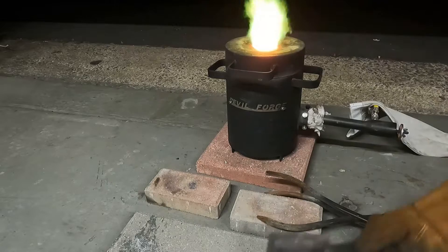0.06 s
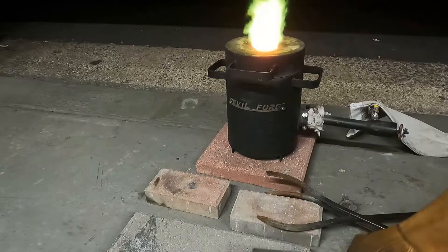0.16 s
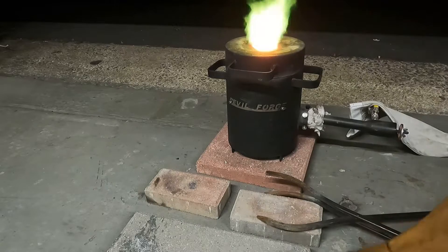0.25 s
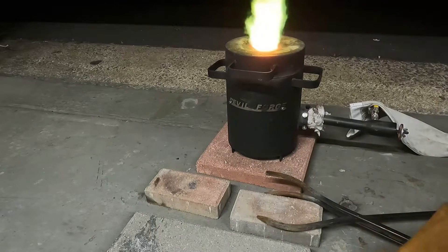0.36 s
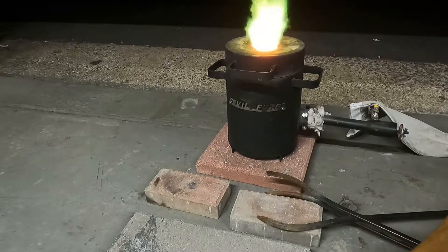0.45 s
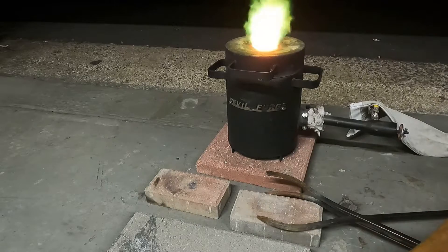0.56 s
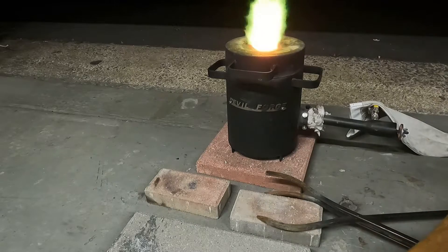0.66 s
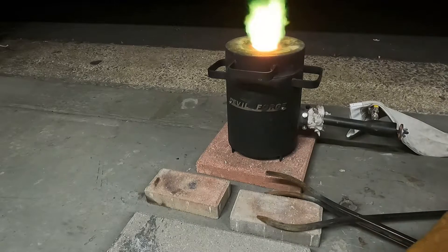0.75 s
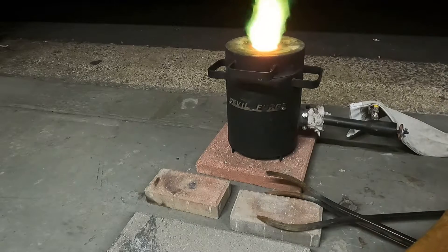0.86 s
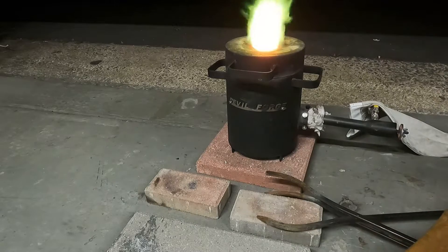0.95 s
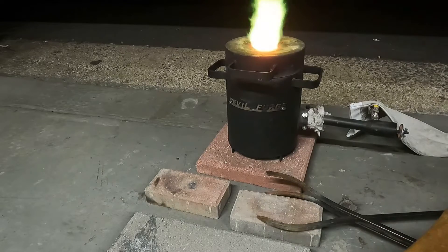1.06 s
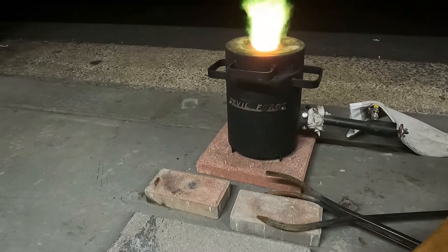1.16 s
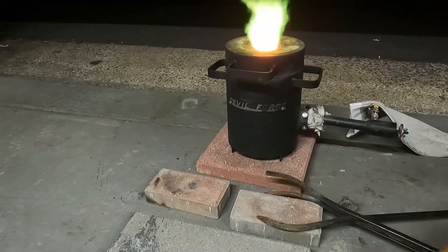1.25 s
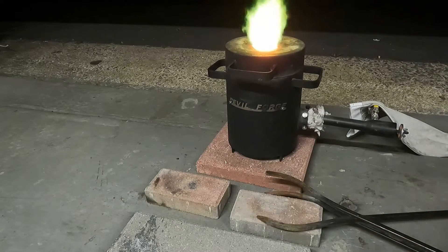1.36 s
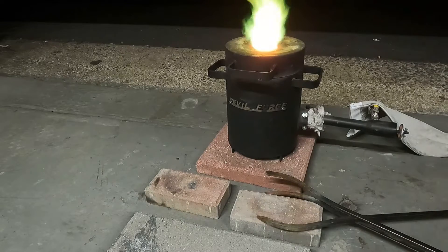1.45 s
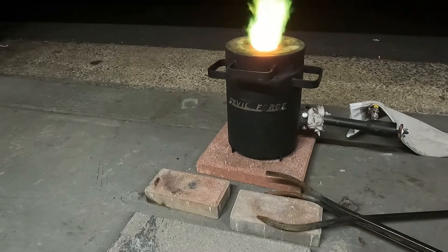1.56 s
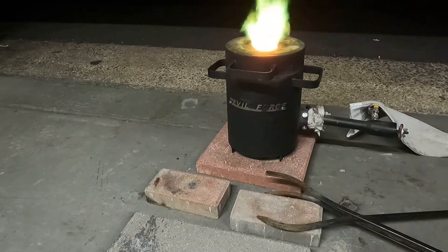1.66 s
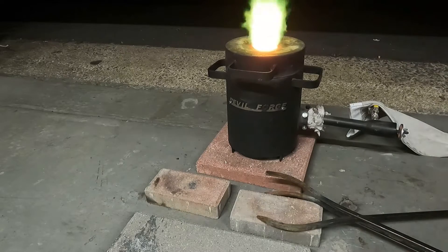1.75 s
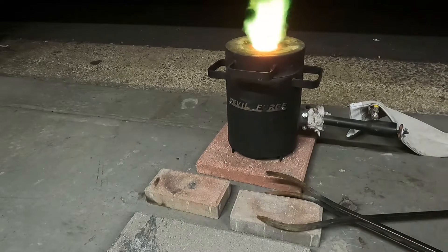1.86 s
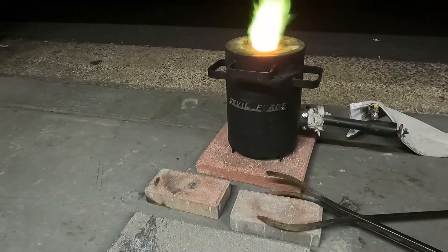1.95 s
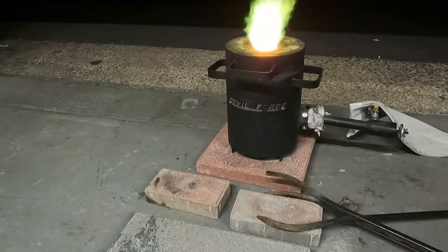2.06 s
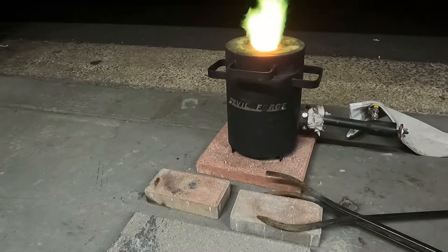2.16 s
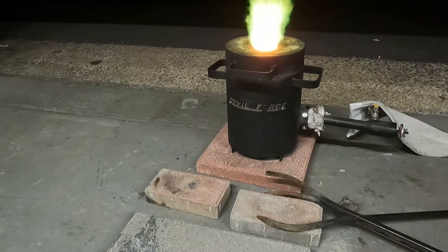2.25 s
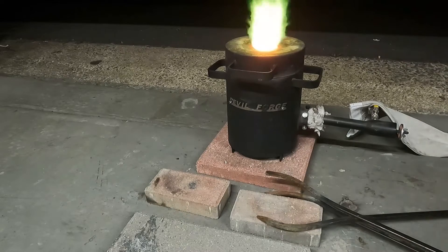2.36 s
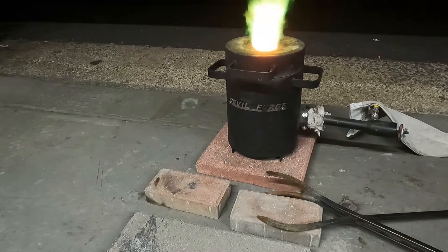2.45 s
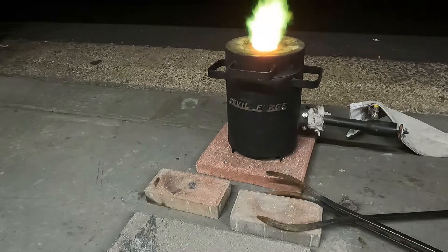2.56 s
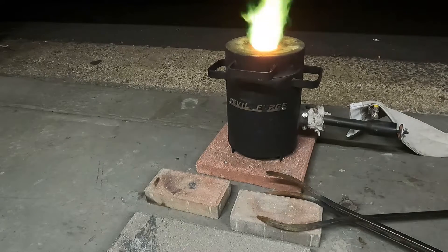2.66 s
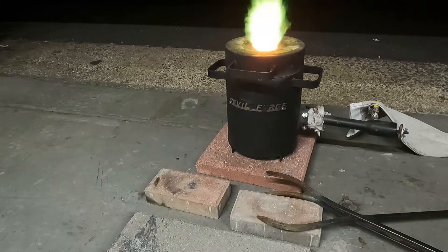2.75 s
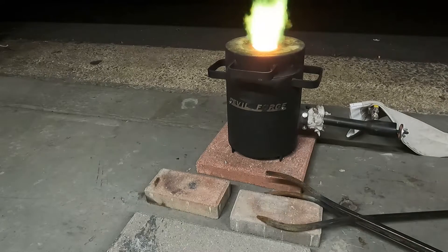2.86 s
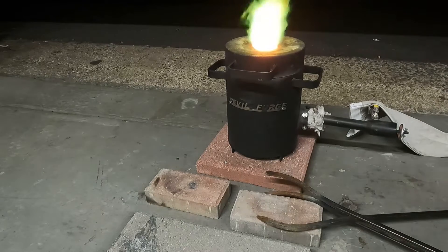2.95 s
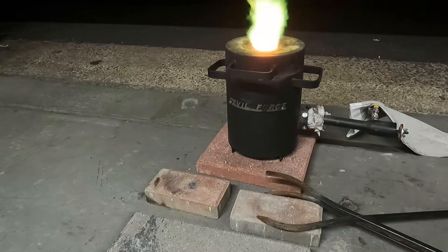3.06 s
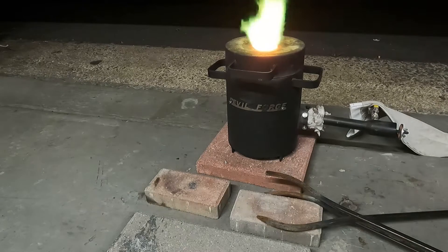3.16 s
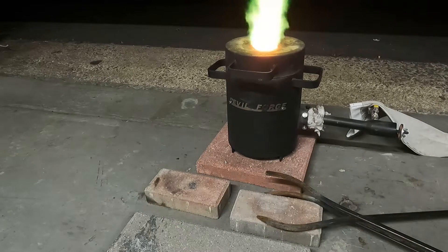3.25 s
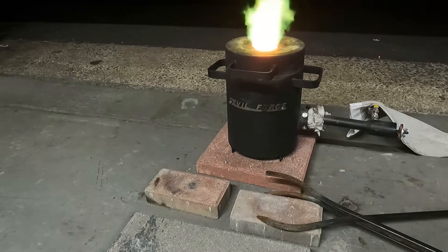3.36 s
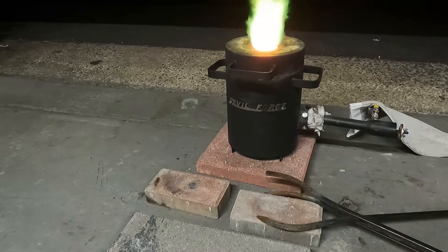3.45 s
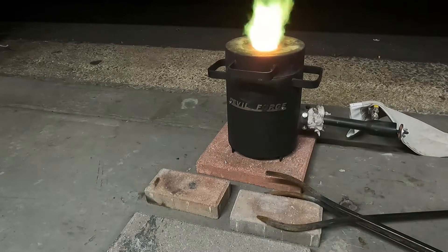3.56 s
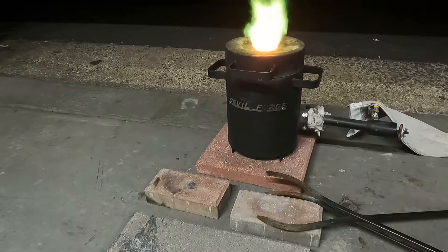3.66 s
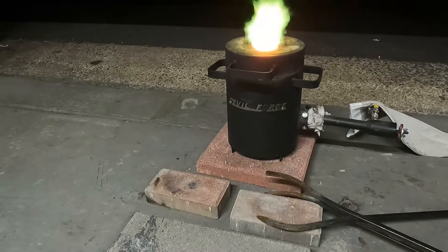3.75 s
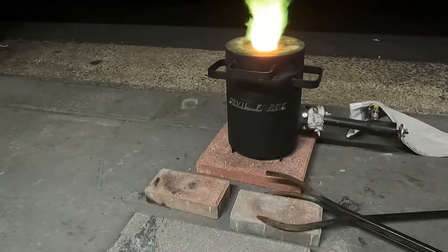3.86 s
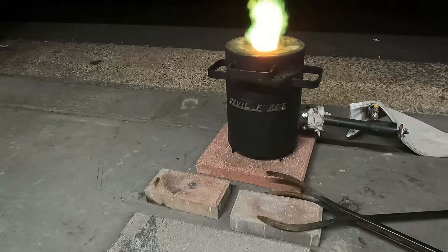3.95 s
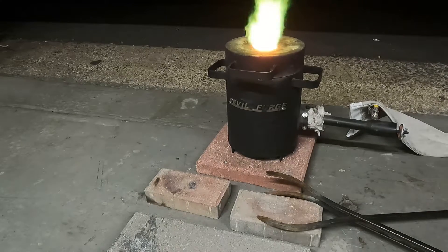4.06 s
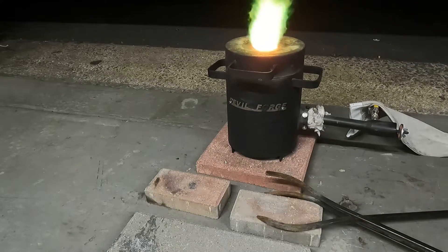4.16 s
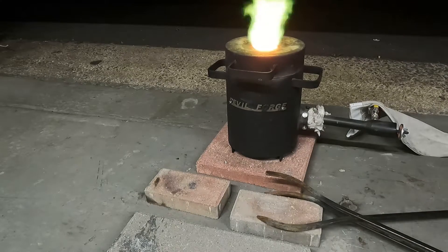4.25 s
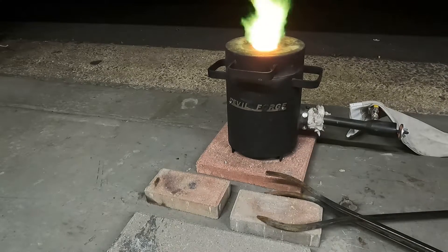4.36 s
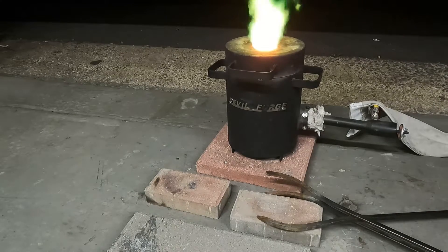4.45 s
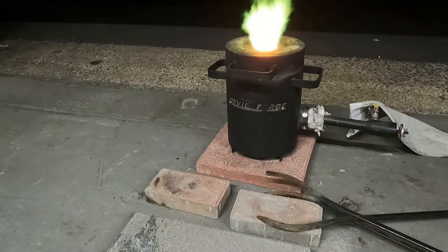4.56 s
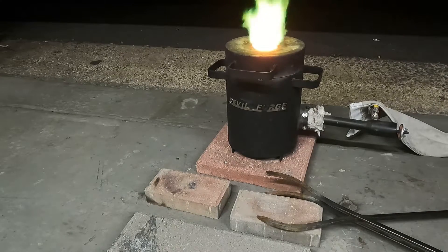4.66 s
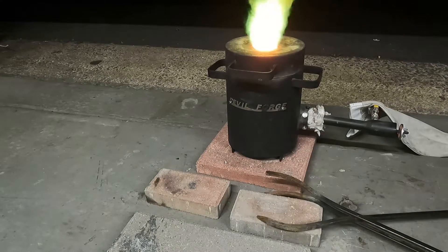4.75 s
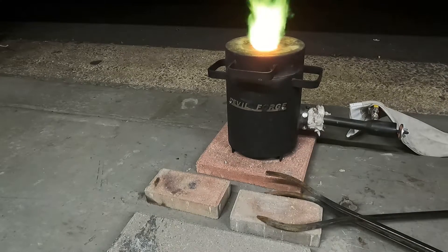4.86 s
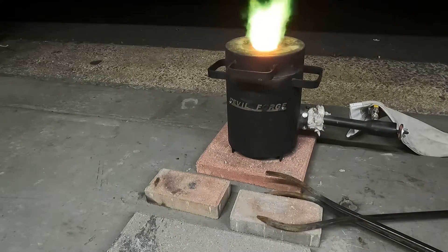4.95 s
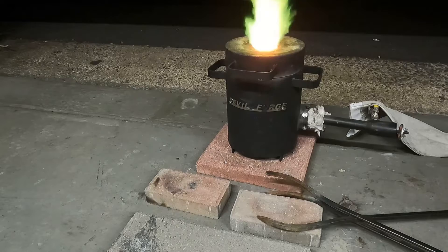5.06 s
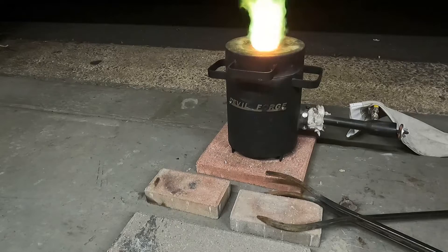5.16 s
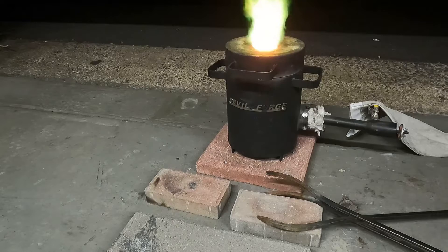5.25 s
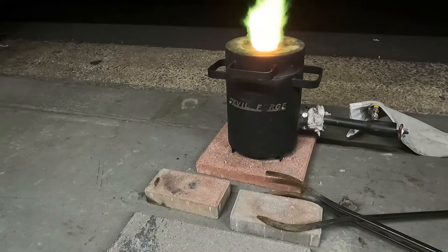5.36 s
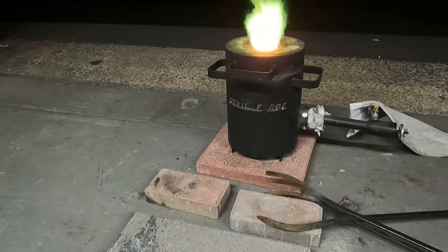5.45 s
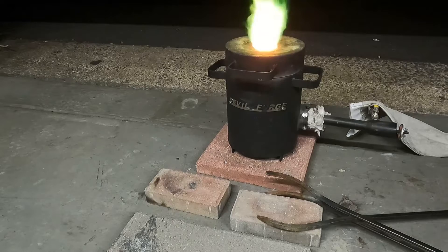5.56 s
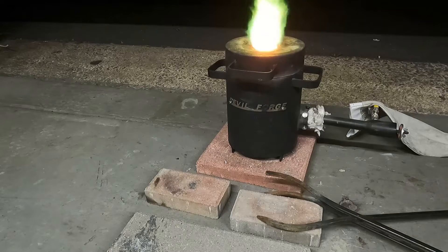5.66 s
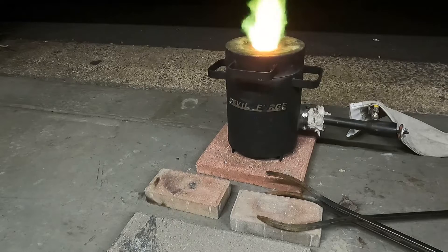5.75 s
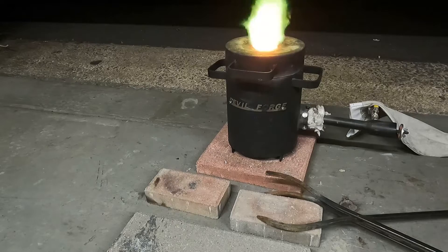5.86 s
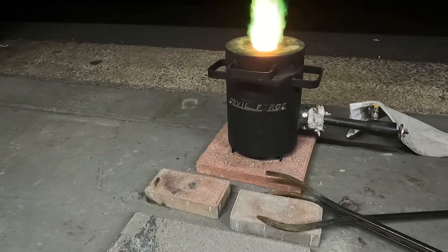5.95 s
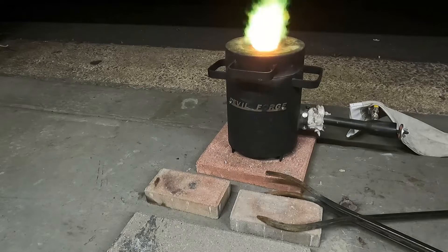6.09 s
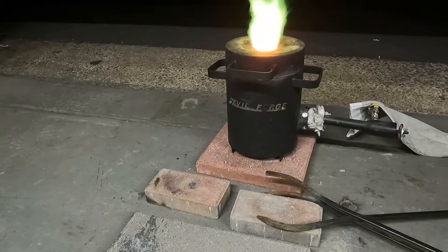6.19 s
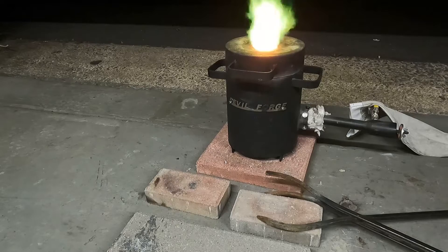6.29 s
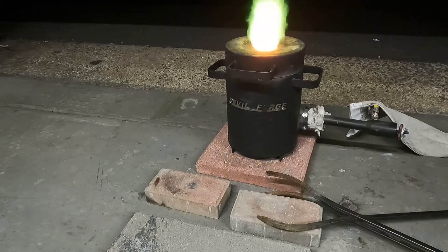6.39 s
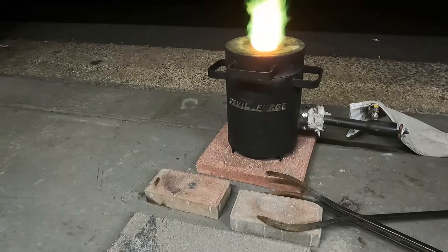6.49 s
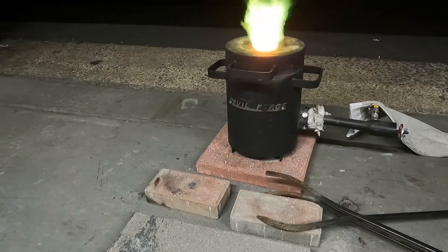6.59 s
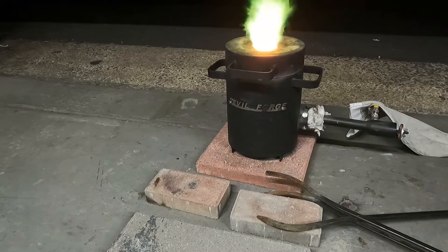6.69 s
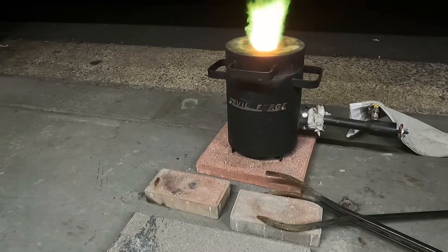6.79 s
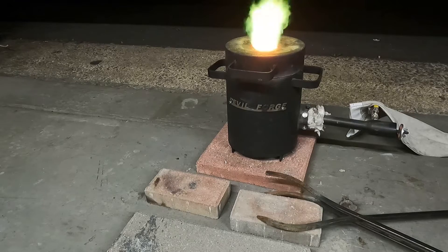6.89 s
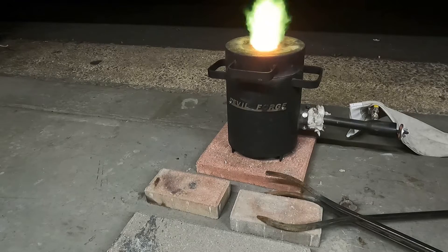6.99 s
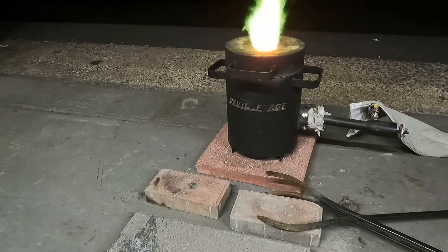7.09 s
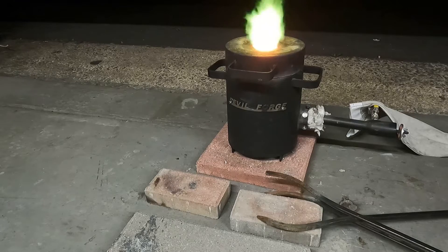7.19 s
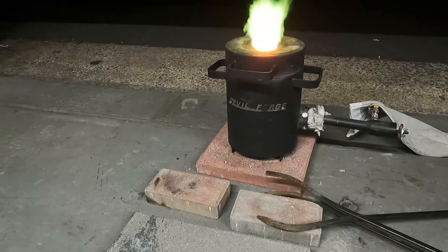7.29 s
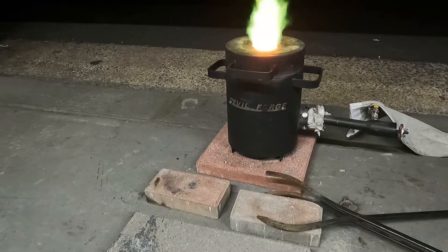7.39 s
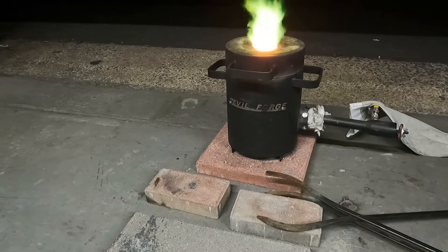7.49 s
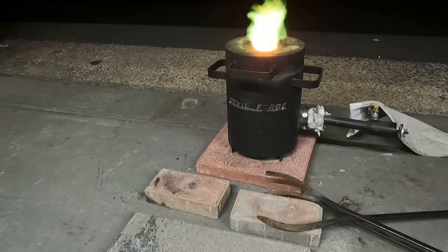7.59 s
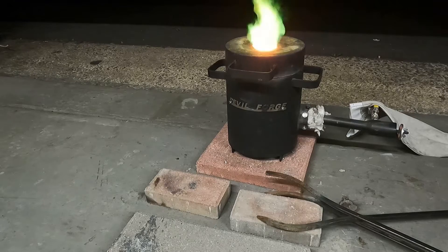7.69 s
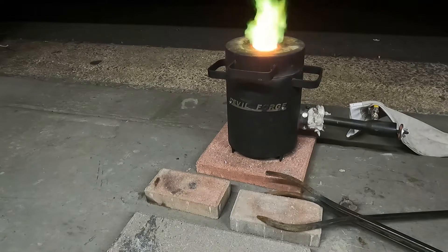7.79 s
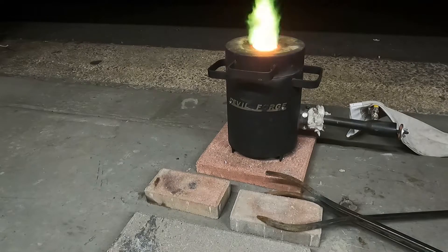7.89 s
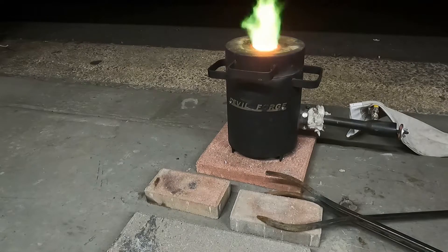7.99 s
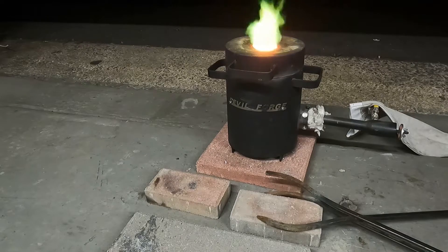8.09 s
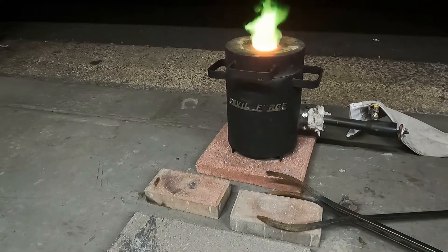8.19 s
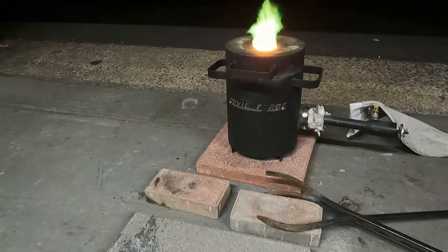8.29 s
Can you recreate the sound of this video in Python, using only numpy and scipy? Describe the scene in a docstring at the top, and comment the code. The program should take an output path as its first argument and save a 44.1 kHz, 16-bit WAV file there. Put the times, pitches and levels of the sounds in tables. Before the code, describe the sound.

A propane burner roars low and steady in a small furnace, one dull steel clack early on, the roar sinking near the end.

```python
"""A propane burner roars into a small melting furnace on a concrete yard, heard by two microphones close by.
From the start the flame drones in the furnace and the gas jet hisses in the burner tube: both are shaped noise.
After half a second a steel tool is laid on the concrete once: a short crack and a few damped tones.
Near the end the valve is turned down and the roar and hiss sink. Nearby walls answer the burner and the tool
throughout, over a faint steady background, and a compressor holds the bass peaks down."""
import sys
import numpy as np
from scipy import signal
from scipy.fft import rfft, irfft, next_fast_len
from scipy.io import wavfile
from scipy.ndimage import uniform_filter1d, minimum_filter1d, map_coordinates

SR = 44100
rng = np.random.default_rng(int(sys.argv[2]) if len(sys.argv) > 2 else 0)


def unload_audio(sound):
    """Save the sound as a 16-bit wav file, at the path given as the first command line argument."""
    columns = np.transpose(np.atleast_2d(sound))
    # keep every value between -1 and 1, then stretch to whole-number steps
    steps = np.round(np.clip(columns, -1, 1) * 32767)
    wavfile.write(sys.argv[1], SR, steps.astype(np.int16))


N = 367353  # length in samples

# Faint steady background. Each row: centre in Hz, width in Hz, relative level in dB.
BACKGROUND_BANDS = [(1700, 1500, 0)]
BACKGROUND_DB = -59

# How the walls' answer dies away. Each row: frequency in Hz, time to fall by 60 dB in seconds.
WALL_DECAY = [(100, 0.35), (500, 0.61), (2000, 0.28), (8000, 0.38)]
# How much of the burner comes off the walls. Each row: frequency in Hz, level in dB.
BURNER_ECHO = [(60, -39), (280, -26), (610, -19.5), (1330, -18), (2900, -9), (13600, -7.5)]
# Reflections weaken or strengthen the burner's sound. Each row: centre in Hz, width in Hz, change in dB.
REFLECTION_DIPS = [(123, 17, -1), (345.2, 7.7, -8.5), (488, 12, -1.5), (1280, 14, 1), (1970, 130, -10.5),
                   (5350, 150, 0.5)]

# The burner reaches one microphone ahead of the other. Each row: frequency in Hz, lead of the left in radians.
LEFT_LEAD = [(60, -.005), (300, -.06), (1290, -.35), (2000, -.4), (3000, -.7), (3700, -.5), (5500, -.2),
             (8000, -.1), (13000, 0)]
# The burner is not equally loud in both. Each row: frequency in Hz, left minus right in dB.
LEFT_LEAN = [(60, -1), (130, 0.5), (280, -0.5), (610, -0.5), (1330, -1.5), (2900, -2), (6290, -1.5),
             (13600, 0.5)]
# Noise the two microphones do not share. Each row: frequency in Hz, level against the shared noise in dB.
UNSHARED = [(40, -42), (130, -31), (280, -23), (610, -20), (1330, -13), (2900, -8.5), (6290, -12),
            (9500, -15), (13600, -7)]

# The tool touches the concrete. Each row: start in seconds, level in dB.
TOOL_CONTACTS = [(.5352, -6)]
# Tones of the steel. Each row: pitch in Hz, level in dB before a small random change,
# time to fall by 60 dB in seconds, rise time in seconds.
STEEL_TONES = [(880, -6.5, .024, .001), (1240, -2.5, .015, .0008), (1600, -7, .013, .0008),
               (1980, -6, .021, .0017), (2220, -2, .013, .0018), (2900, -23, .014, .002),
               (3330, -20, .014, .002), (3560, -23, .056, .0035), (4380, -25.5, .02, .0007)]
TOOL_LAG_S, TOOL_LEAN_DB = 4e-5, -1  # left later than right, left minus right
TOOL_ECHO_DB, TOOL_ECHO_WIDTH = -7.5, .4  # echo level, share of the echo that differs left to right

# Gas flow through the valve. Each row: time in seconds, flow in dB against full.
VALVE_FLOW = [(0, 0), (6.3, 0), (6.9, -0.6), (7.2, -1.5), (7.4, -2), (7.65, -4.5), (7.93, -7), (8.1, -7),
              (8.33, -8)]
# The drone gains what the hum loses. Each row: time in seconds, gain of the drone in dB.
HUM_TO_DRONE = [(0, -1.1), (2, -1), (3.9, 0.3), (4.6, 0.65), (6.8, 0.35), (7.4, -1), (8.33, 1)]
# Small chance unevenness in the growl's level. Each row: time in seconds, change in dB.
GROWL_UNEVENNESS = [(0, 1), (1.2, 0.9), (1.7, -0.2), (2.5, 0), (3, 0), (3.9, 1.5), (4.4, -1), (6, 0.4),
                    (6.7, -0.5), (8.33, 1.5)]

# The burner's resonances, one table per layer, layers from low to high; jet rows in no strict order.
# Each row: centre in Hz, width in Hz, relative level in dB.
THROB_MODES = [(47, 22, -44.5), (73.6, 31, -40), (96, 39, -29.5)]  # slow puffing of the flame at the vent
HUM_MODES = [(147, 31, -21), (172.7, 37, -22.5)]  # lowest resonances of the furnace
DRONE_MODES = [(208, 30, -32), (229.6, 49, -25.5), (255, 27.6, -23.5), (291.6, 37, -26), (324.9, 39, -25.5)]  # low resonances
GROWL_MODES = [(378.4, 18, -33), (415, 19.4, -35.5), (448.3, 97, -37.5), (502.5, 11, -38),
               (526.5, 27, -40.5), (581, 33, -40.5), (601, 25, -44.5), (631, 45, -41.5), (669, 30, -46),
               (721, 69, -44.5), (761, 74, -48)]  # middle resonances
ROAR_MODES = [(843, 100, -48), (906, 25, -48), (994, 170, -48.5), (1105, 195, -52), (1167, 29, -55.5),
              (1258, 37, -51), (1362, 160, -55.5), (1508, 400, -57), (1763, 150, -60.5)]  # upper resonances
JET_MODES = [(2220, 100, -70), (2477, 295, -62.5), (2918, 470, -66), (3546, 180, -72), (3780, 410, -74),
             (4450, 580, -66.5), (4960, 320, -70), (5170, 116, -68), (5680, 105, -72.5), (5950, 370, -73.5),
             (6340, 480, -77.5), (7110, 1120, -76), (7820, 360, -81), (8460, 660, -87), (9000, 500, -87),
             (9450, 300, -85), (10270, 250, -85), (5400, 250, -79), (9780, 150, -80.5), (10020, 270, -81.5),
             (10880, 760, -84), (11930, 1200, -85), (13000, 700, -96.5), (13850, 400, -101)]  # the burner tube

# Layer levels in dB at full flow, before the walls and the compressor.
THROB_DB, HUM_DB, DRONE_DB, GROWL_DB, ROAR_DB, JET_DB = -26.5, -17, -17, -26, -34, -45.5
# Change of each layer in dB per dB of flow; the hum goes with the drone, the jet follows one to one.
THROB_FOLLOWS, DRONE_FOLLOWS, GROWL_FOLLOWS, ROAR_FOLLOWS = -0.22, 0.94, 1.45, 1
SURGE_DB, SURGES_PER_S = 1.07, 2.38  # size and pace of the low flame's random swelling

TOP_HZ = 14150  # nothing passes from here up


def amp(db):
    """Turn decibels into a plain multiplier."""
    return 10 ** (np.asarray(db) / 20)


def unit(x):
    """Scale to an average strength (rms) of 1."""
    return x / np.sqrt(np.mean(x ** 2) + 1e-20)


def along(points, hz):
    """Read a (Hz, value) table at any frequency, on a log axis."""
    f, v = np.transpose(points)
    return np.interp(np.log(hz + 1), np.log(f + 1), v)


def over_time(points):
    """Read a (seconds, value) table at every sample."""
    return np.interp(np.arange(N) / SR, *np.transpose(points))


def wobble(rate):
    """A smooth random curve through `rate` random points a second."""
    points = rng.standard_normal(int(N * rate / SR) + 4)
    return map_coordinates(points, [np.arange(N) * rate / SR])


def filtered(x, response):
    """Change the strength and phase of each frequency in x."""
    m = next_fast_len(N + 8192)
    hz = np.fft.rfftfreq(m, 1 / SR)
    return irfft(rfft(x, m) * response(hz), m)[..., :N]


def patchy(x, window, bins, frames, depth_db):
    """Strengthen and weaken patches of frequency and time at random, alike in both channels."""
    z = signal.stft(x, nperseg=window)[2]
    field = uniform_filter1d(rng.standard_normal(z.shape[1:]), size=bins, axis=0)
    field = uniform_filter1d(field, size=frames, axis=1)
    return signal.istft(z * amp(depth_db * unit(field)), nperseg=window)[1][:, :N]


def turbulence(modes, patchy_db):
    """Rushing gas: patchy stereo noise of rms 1, shaped by steep resonances."""
    mid_and_side = patchy(rng.standard_normal((2, N)), 512, 5, 7, patchy_db)

    def peaks(f):
        power = 0
        for c, w, db in modes:
            detuning = (f * f - c * c) / (np.maximum(f, 1) * w)
            power = power + amp(2 * db) / (1 + detuning ** 2) ** 2
        return np.sqrt(power)

    mid, side = filtered(mid_and_side, lambda f: peaks(f) * [np.ones_like(f), amp(along(UNSHARED, f))])
    return unit(np.array([mid + side, mid - side]))


def wandering(x, depth_db):
    """Narrow bands swell and fade over about half a second, each on its own."""
    return unit(patchy(x, 4096, 4, 10, depth_db))


def background():
    """Faint steady noise in one broad band."""
    return amp(BACKGROUND_DB) * turbulence(BACKGROUND_BANDS, patchy_db=1.1)


def yard(x):
    """Nearby walls answer after 6 ms with a noise tail, each frequency dying at its own speed."""
    hz, t, z = signal.stft(rng.standard_normal((2, SR // 2)), SR, nperseg=256)
    fade = amp(-60 * t / along(WALL_DECAY, hz)[:, None])
    tail = signal.istft(z * fade, SR, nperseg=256)[1]
    tail = tail / np.linalg.norm(tail[0])
    delayed = np.pad(x, (260, 0))
    return signal.fftconvolve(delayed[None], tail, axes=1)[:, :N]


def tool():
    """A short dead knock of steel on concrete: a noisy crack and a few quickly damped tones."""
    out, t = np.zeros(N + SR), np.arange(SR // 10) / SR
    for start, db in TOOL_CONTACTS:
        ring = 0
        for k, (hz, level, t60, rise) in enumerate(STEEL_TONES):
            fade = amp(level + rng.normal(0, 0.66) - 60 * t / t60)
            onset = 1 - np.exp(-(t / rise) ** 2)
            # neighbouring tones start in opposite sense
            ring = ring + (-1) ** k * fade * onset * np.sin(2 * np.pi * hz * t)
        dull_noise = uniform_filter1d(uniform_filter1d(rng.standard_normal(len(t)), size=4), size=3)
        crack = dull_noise * amp(-24 - 60 * t / .012) * (1 - np.exp(-t / .0008))
        out[round(start * SR):][:len(t)] += amp(db) * (ring + crack)
    return out[:N]


def tool_at_microphones():
    """The knock arrives directly, a little later and weaker on the left, and off the walls."""
    knock = tool()
    echo = yard(knock)
    shared = echo.mean(0)
    echo = np.sqrt(2) * shared + TOOL_ECHO_WIDTH * (echo - shared)
    sides = np.array([[.5], [-.5]])  # left, right

    def arrival(hz):
        return amp(sides * TOOL_LEAN_DB) * np.exp(-2j * np.pi * hz * sides * TOOL_LAG_S)

    return filtered(knock, arrival) + amp(TOOL_ECHO_DB) * echo


def surge_db():
    """The low flame swells and sags at random."""
    return SURGE_DB * wobble(SURGES_PER_S)


def throb(flow_db):
    """The flame puffs at the vent, slightly stronger as the flow drops."""
    level_db = THROB_DB + THROB_FOLLOWS * flow_db + surge_db()
    return amp(level_db) * turbulence(THROB_MODES, patchy_db=0.0)


def hum_and_drone(flow_db):
    """The flame excites the low furnace resonances; strength passes between hum and drone."""
    shift_db = over_time(HUM_TO_DRONE)
    hum_db = HUM_DB - shift_db + DRONE_FOLLOWS * flow_db + surge_db()
    drone_db = DRONE_DB + shift_db + DRONE_FOLLOWS * flow_db + surge_db()
    hum = amp(hum_db) * turbulence(HUM_MODES, patchy_db=0.9)
    drone = amp(drone_db) * turbulence(DRONE_MODES, patchy_db=1.22)
    return hum + drone


def growl(flow_db, flicker):
    """Middle resonances that wander, flicker and vary a little in level."""
    level_db = GROWL_DB + GROWL_FOLLOWS * flow_db + 0.46 * flicker + over_time(GROWL_UNEVENNESS)
    return amp(level_db) * wandering(turbulence(GROWL_MODES, patchy_db=0.54), depth_db=0.87)


def roar(flow_db, flicker):
    """Upper resonances that wander and flicker."""
    level_db = ROAR_DB + ROAR_FOLLOWS * flow_db + 0.48 * flicker
    return amp(level_db) * wandering(turbulence(ROAR_MODES, patchy_db=0.6), depth_db=1.33)


def jet(flow_db, flicker):
    """Gas hisses through the burner tube, in step with the flow."""
    return amp(JET_DB + flow_db + 0.23 * flicker) * turbulence(JET_MODES, patchy_db=1.0)


def burner():
    """Flame and jet follow the valve; one flicker of the flame shakes all the upper sound."""
    flow_db = over_time(VALVE_FLOW)
    flicker = 0.6 * wobble(3.13) + 0.61 * wobble(13) + .5 * wobble(40)
    low = throb(flow_db) + hum_and_drone(flow_db)
    return low + growl(flow_db, flicker) + roar(flow_db, flicker) + jet(flow_db, flicker)


def burner_arrival(hz):
    """The burner reaches the microphones at different strengths and moments, coloured by reflections."""
    half = amp(along(LEFT_LEAN, hz) / 2) * np.exp(.5j * along(LEFT_LEAD, hz))
    dips_db = sum(db / (1 + (2 * (hz - c) / w) ** 2) for c, w, db in REFLECTION_DIPS)
    return np.array([half, 1 / half]) * amp(dips_db)


def burner_at_microphones():
    """The burner arrives directly and off the walls."""
    flame = burner()
    echoes = filtered(yard(flame.mean(0)), lambda hz: amp(along(BURNER_ECHO, hz)))
    return filtered(flame + echoes, burner_arrival)


def scene():
    """Background, tool and burner together at the two microphones."""
    return background() + tool_at_microphones() + burner_at_microphones()


def record(dry):
    """A fast compressor leans on the bass above its knee, less on the rest; then the top is cut off."""
    bass = filtered(dry, lambda hz: 1 / (1 + (hz / 380) ** 6))
    over = np.maximum(1, np.abs(bass).max(0) / .3)  # how far the louder side is above the knee
    gain = uniform_filter1d(minimum_filter1d(over ** -.75, size=900), size=700)  # sizes in samples
    held_bass = bass * gain * amp(2.0)
    rest = (dry - bass) * gain ** 0.28
    return filtered(held_bass + rest, lambda hz: hz < TOP_HZ)


dry = scene()
out = record(dry)
unload_audio(out)
```